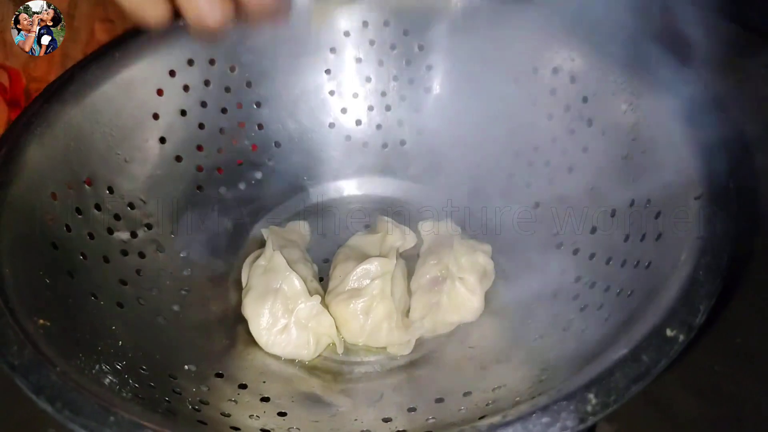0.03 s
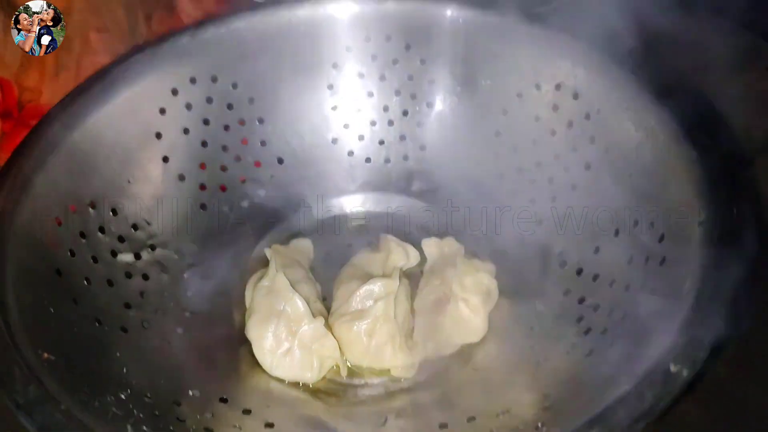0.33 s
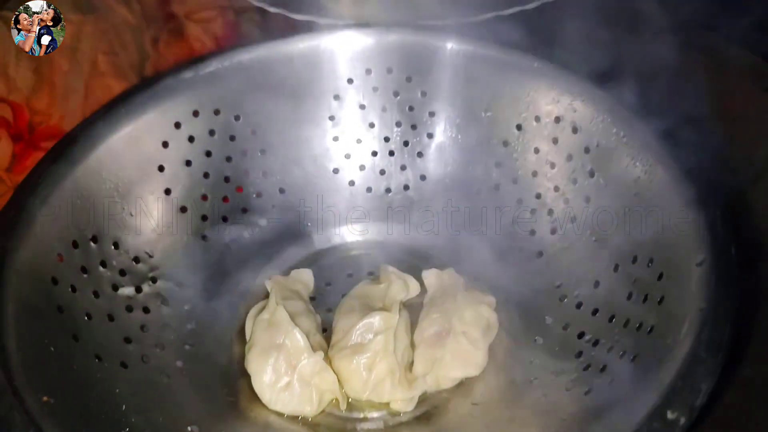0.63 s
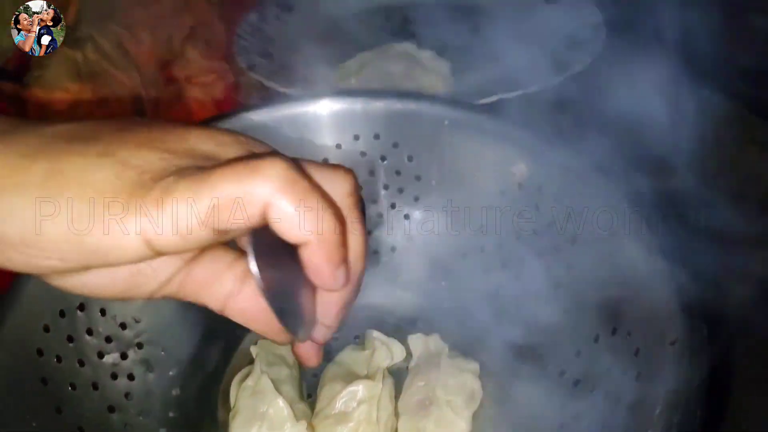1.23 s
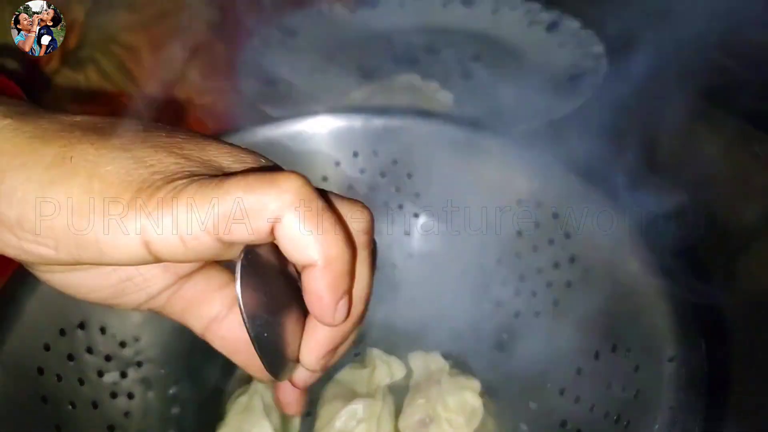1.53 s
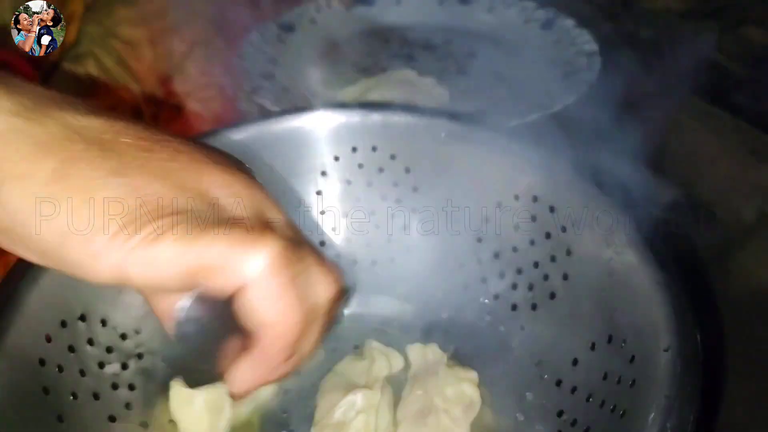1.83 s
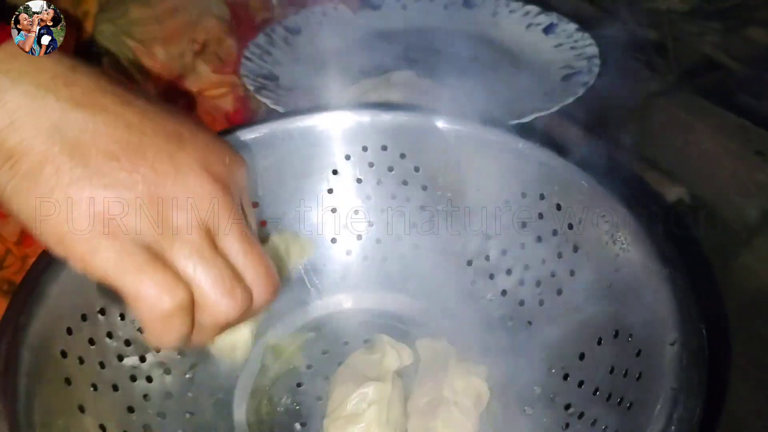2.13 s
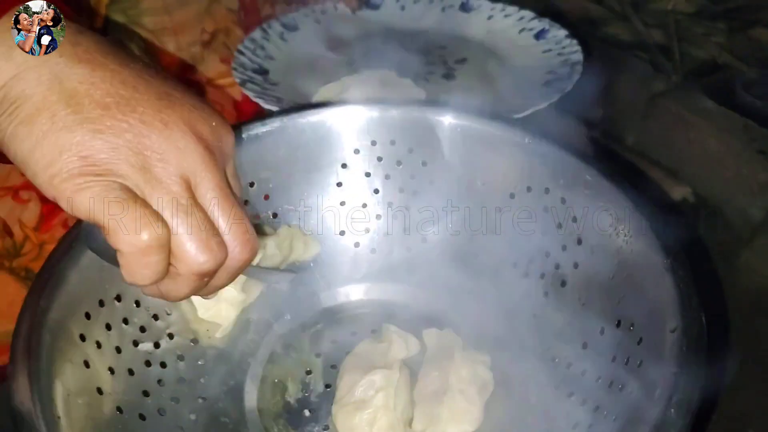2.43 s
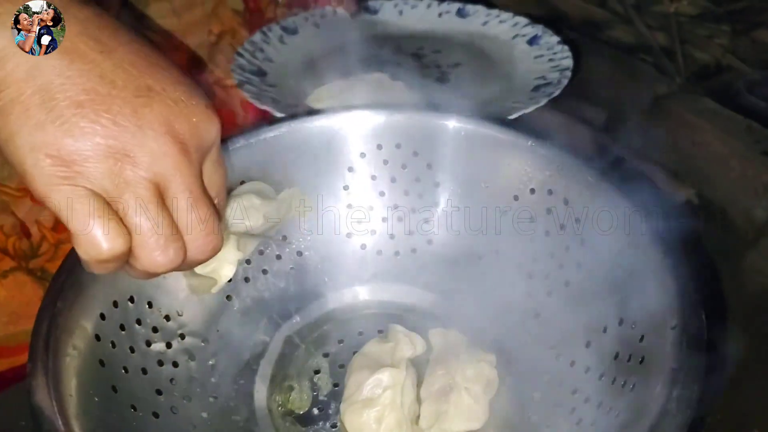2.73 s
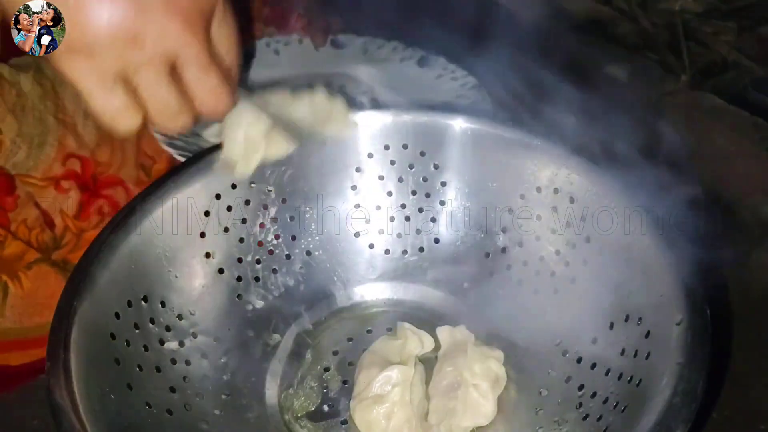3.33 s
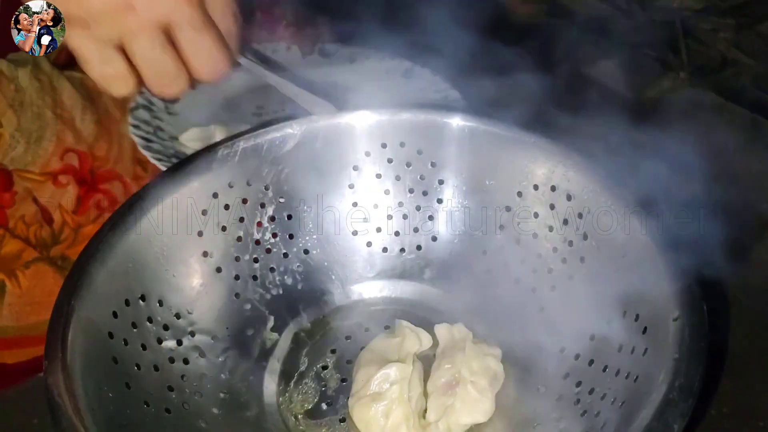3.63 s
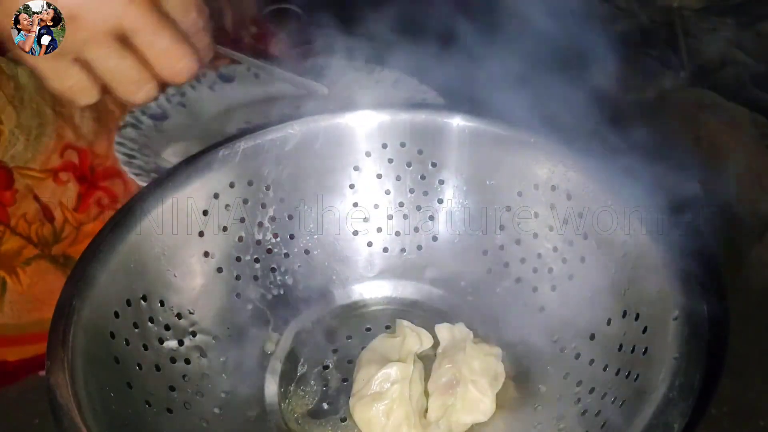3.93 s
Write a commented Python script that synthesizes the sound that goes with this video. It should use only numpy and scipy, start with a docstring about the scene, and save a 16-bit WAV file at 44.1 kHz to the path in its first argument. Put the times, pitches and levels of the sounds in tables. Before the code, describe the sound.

Steam hisses brightly from a steel steamer, close by, for the first 0.3 seconds. A lull follows, with faint insect chirps, a low rumble and a few soft water plops. From 2.3 seconds the steam surges and spits again, weakening after 3 and fading by 3.6. A spoon clinks on the metal at 3.7, scrapes across it with a slight squeal, and knocks a plate at 3.9.

```python
"""Steam hisses and spits from a perforated steel steamer in uneven surges: turbulent jets give broadband
noise, bursting drops give clicks, and the bowl colours both. Water plops in the pot below, which booms.
A spoon lifts out a dumpling with a faint hollow tone, clinks on the metal, scrapes across it and knocks
at the plate, each blow exciting damped modes. A cricket and a katydid stridulate faintly over a low
rumble. Two close microphone ports hear the steamer, the left one first."""
import sys
import numpy as np
from scipy import signal
from scipy.fft import rfft, irfft
from scipy.io import wavfile
from scipy.ndimage import uniform_filter1d

SR = 44100
rng = np.random.default_rng(int(sys.argv[2]) if len(sys.argv) > 2 else 0)


def digitize_waveform(pressure):
    """Quantize a signal to 16-bit integers and store it at the path in sys.argv[1].

    Rows of a 2-D input are taken as channels; values are limited to [-1, 1].
    """
    field = np.atleast_2d(pressure).T
    bounded = np.clip(field, -1, 1)
    quanta = np.round(bounded * 32767).astype(np.int16)
    wavfile.write(sys.argv[1], SR, quanta)


N = 176400

# Levels in the tables are relative.
# left minus right for sound from the steamer (frequency [Hz], level difference [dB])
PORT_BALANCE = [(300, 0), (1250, 1), (1800, 0.5), (2500, 0.5), (4400, 4.5), (8000, 4.5), (15000, 8.5)]
# resonances of the steel bowl (frequency [Hz], bandwidth [Hz], level [dB])
BOWL_RESONANCES = [(762, 81, 4), (1160, 60, 10), (1482, 24, 10)]
# steam surges, one list each (time [s], hiss level [dB], rush level [dB])
SURGES = [
    [(0.0, -32.5, -55), (0.026, -31.5, -57), (0.052, -37, -63.5), (0.148, -29, -54.5), (0.16, -32, -52.5),
     (0.198, -38, -66), (0.26, -41.5, -62), (0.284, -55, -80), (0.334, -81, -69), (0.36, -65, -85)],
    [(2.28, -82, -92), (2.298, -54.5, -58), (2.334, -38, -49.5), (2.376, -36, -53), (2.448, -32, -43.5),
     (2.526, -35, -46.5), (2.602, -32.5, -46), (2.62, -35, -42.5), (2.634, -42, -57.5), (2.66, -50, -55)],
    [(2.69, -45, -54.5), (2.702, -44, -57), (2.722, -43.5, -46.5), (2.74, -33, -47), (2.854, -37, -48.5),
     (2.904, -35.5, -49.5), (2.924, -40, -53), (2.974, -41.5, -57.5), (3.01, -53.5, -58.5)],
    [(3.04, -52.5, -58.5), (3.08, -46.5, -58.5), (3.196, -46.5, -58.5), (3.224, -46.5, -57),
     (3.286, -57, -66), (3.304, -54, -62), (3.312, -48, -57.5), (3.336, -40, -54.5), (3.372, -38.5, -52.5),
     (3.42, -47.5, -59.5), (3.602, -48.5, -65), (3.63, -59, -61)],
]
# spectra of the bright hiss and the lower rush (frequency [Hz], level [dB])
HISS_SPECTRUM = [(2500, -53), (4300, -42), (5000, -6), (5700, -0.5), (7500, 0), (9000, 0.5), (10500, -1.5),
                 (12500, -1.5), (14000, -2), (15300, 0.5)]
RUSH_SPECTRUM = [(120, -26.5), (350, -3.5), (700, -8), (1200, -9), (1750, -9.5), (2150, -4.5), (2450, 0),
                 (3200, 0), (3800, 0.5), (4600, -1), (6000, 0.5), (12000, -22)]
# drops spitting on hot metal (time [s], level [dB])
SPIT_EVENTS = [(.022, -27), (1.169, -44), (2.407, -28), (2.539, -19.5), (2.558, -19), (2.584, -17),
               (2.744, -23), (3.0227, -30.5), (3.092, -33)]
# hollow resonances colouring the first surge of steam (frequency [Hz], level [dB])
HOLLOW_RESONANCES = [(1950, -5), (2570, -7), (2850, 0.5), (3060, -0.5), (3330, -1.5), (3560, 5.5),
                     (3780, 6), (4400, 8.5)]
# their envelope (time [s], level [dB])
HOLLOW_ENVELOPE = [(0, -57.5), (.08, -57), (.13, -51), (.17, -54), (.2, -59), (.25, -56), (.33, -73),
                   (.45, -130)]
# spectra of the rumble, its side-signal filter and the airy hiss (frequency [Hz], level [dB])
RUMBLE_SPECTRUM = [(20, -25), (40, -13), (70, -0.5), (110, 4), (170, -5.5), (300, -10), (550, -12.5),
                   (900, -20.5), (1250, -18), (1800, -26), (3200, -23), (4400, -19.5), (6000, -27),
                   (10000, -27), (16000, -24.5)]
SIDE_FILTER = [(100, -14.5), (220, -13.5), (400, -4.5), (750, -4.5), (1300, 4), (2400, 0)]
AIR_SPECTRUM = [(200, -16), (1000, -19), (4000, -4), (15000, -4.5)]
# cricket chirps (time [s], duration [s], level [dB])
CRICKET_CHIRPS = [(0.21, .13, -57), (0.499, 0.12, -62.5), (0.75, 0.14, -66), (1.02, 0.13, -66),
                  (1.266, 0.13, -68.5), (1.544, 0.17, -72.5), (1.778, 0.16, -71), (2.113, 0.12, -69.5)]
# spectrum of the katydid's rasp (frequency [Hz], level [dB])
RASP_SPECTRUM = [(9000, -37), (12000, -12), (13500, 0), (14900, 8), (16000, -10)]
# plops in the pot (time [s], level [dB], centre frequency [Hz], splash T60 [s])
PLOP_EVENTS = [(.4945, -43.5, 786, 0.032), (.733, -51, 450, 0.037), (1.167, -37, 348, 0.02),
               (2.169, -42, 397, 0.025), (2.437, -45, 395, 0.099), (2.606, -31.5, 825, 0.057),
               (2.611, -39.5, 377, 0.031), (2.821, -44.5, 417, 0.059), (3.029, -43.5, 466, 0.025)]
# spectrum of a splash (frequency over centre frequency [ratio], level [dB])
SPLASH_SPECTRUM = [(.2, -20), (.5, -6), (1, 0), (3.07, -23.5), (20, -42)]
# spoon blows (time [s], crack [dB], crack T60 [s], tick [dB], steel [dB], plate [dB], spoon [dB])
SPOON_BLOWS = [(0.496, -43.5, 0.032, -58, -71, -58, -73), (3.6609, -21.5, 0.076, -18.5, -33, -33.5, -20),
               (3.671, -34, 0.1, -33, -45.5, -35, -41), (3.882, -16, 0.04, -33, -50, -28.5, -40)]
# spectrum of the contact crack (frequency [Hz], level [dB])
CRACK_SPECTRUM = [(30, -22), (150, -11.5), (350, -9.5), (550, -7), (850, -0.5), (1200, 6), (1700, 6.5),
                  (2150, 1), (2500, -4.5), (3000, -1.5), (4500, -7), (5700, 2), (8000, -6.5), (11000, -15),
                  (15500, -20)]
# normal modes of the steel dish, the plate and the spoon (frequency [Hz], level [dB], T60 [s])
STEEL_MODES = [(1150, 0, .15), (1277, 1, .17), (1480, 4, .25), (1765, 5, .3), (1895, -2, .3),
               (2035, -1, .5), (2165, -4, .4), (2270, -7, .4), (2500, -7, .5), (2700, -5, .6),
               (2821, -6, .6), (2950, -5, .5), (3074, -2, .35), (3205, -5, .45), (3343, -4, .8),
               (3492, -4, .8), (3797, -1, .6), (3965, -3, .7), (4124, -1, .6), (4479, -7, .6),
               (4800, -7, .4), (5044, -5, .4), (5292, -5, .5), (6132, 0, .12)]
PLATE_MODES = [(1118, -3, .2), (1211, -3, .17), (1540, -2, .35), (1720, -1, .17), (2040, -3, .35),
               (2137, -3, .35), (2541, -7, .14), (3020, 3, .08), (3090, -2, .15), (3575, -4, .1),
               (4867, -5, .22), (5367, -3, .15), (5582, 3, .14), (5782, -2, .17), (6266, -2, .12)]
SPOON_MODES = [(6900, -8, .07), (8400, 4, .06), (9030, 4.5, 0.045), (9000, -9, .05), (10300, 1, .05),
               (13800, 0, 0.046), (14700, -3, .04)]
# envelope of the steamer's boom (time [s], level [dB])
BOOM_ENVELOPE = [(2.35, -86), (2.45, -51), (3.0, -82), (3.62, -73), (3.66, -44.5), (3.78, -56.5),
                 (3.88, -49), (4, -56)]
# spectrum of that boom (frequency [Hz], level [dB])
BODY_SPECTRUM = [(30, -31), (80, -0.5), (340, -7), (1000, -32.5)]
# hollow tone of the lifted dumpling (time [s], level [dB], centre frequency [Hz])
DUMPLING_TONE = [(2.95, -100, 470), (3.09, -65, 470), (3.12, -50, 490), (3.18, -56.5, 535),
                 (3.28, -54.5, 530), (3.35, -60, 570), (3.42, -60, 570), (3.52, -55, 600),
                 (3.61, -51.5, 560), (3.72, -49, 560)]
# drag of the spoon (time [s], scrape level [dB], squeal level [dB], squeal frequency [Hz])
SPOON_DRAG = [(3.61, -120, -120, 1400), (3.635, -64, -38, 1392), (3.657, -30, -47, 1520),
              (3.68, -38, -38, 1550), (3.725, -42, -43, 1800), (3.76, -34, -41, 3430),
              (3.80, -28.5, -36, 2892), (3.825, -27.5, -37, 2106), (3.845, -27, -27.5, 1717),
              (3.858, -30, -27, 1694), (3.87, -24.5, -33.5, 1752), (3.895, -27, -36, 1606),
              (3.915, -46, -39, 1710), (3.95, -57, -46, 1900), (4, -91, -55, 1900)]
# spectrum of the scrape (frequency [Hz], level [dB])
SCRAPE_SPECTRUM = [(30, -33), (200, -26), (550, -6), (800, -14.5), (1200, -6.5), (1700, -7), (2250, -11),
                   (3000, -2), (4700, -3), (5600, 6), (7500, 7), (10000, 2), (12500, -2.5), (15500, -1.5)]

TIME, BIN_HZ = np.arange(N) / SR, np.arange(N // 2 + 1) * SR / N
PORT_LAG_S, ROOM_T60_S, ROOM_DB, SCATTER_DB = .000293, .094, 1, 1.5


def undb(db):
    """Amplitude ratio of a level in decibels."""
    return 10 ** (np.asarray(db) / 20)


def unit(x):
    """Normalisation to rms 1."""
    return x / np.sqrt(np.mean(x ** 2))


def noise():
    """Gaussian white noise."""
    return rng.standard_normal(N)


def walk(rate):
    """Smooth random signal of rms 1, with `rate` new values a second."""
    hold = int(SR / rate)
    steps = np.repeat(rng.standard_normal(N // hold + 1), hold)
    return unit(uniform_filter1d(steps, hold)[:N])


def flutter(db, rate):
    """Log-normal amplitude modulation of rms 1."""
    return unit(undb(db * walk(rate)))


def envelope(rows, column=1):
    """Amplitude over time, interpolated in decibels."""
    rows = np.array(rows)
    return undb(np.interp(TIME, rows[:, 0], rows[:, column]))


def glide(rows):
    """Frequency over time, interpolated along the last column."""
    rows = np.array(rows)
    return np.interp(TIME, rows[:, 0], rows[:, -1])


def decay(start, t60):
    """Sudden onset and exponential decay, 60 dB in t60 seconds."""
    age = TIME - start
    return (age >= 0) * np.exp(-np.log(1000) * np.maximum(age, 0) / t60)


def response(points):
    """Magnitude response, interpolated on a logarithmic frequency axis."""
    hz, db = np.array(points, float).T
    return undb(np.interp(np.log(BIN_HZ + 1), np.log(hz), db))


def colour(x, points):
    """Minimum-phase filter that preserves the power of white noise."""
    cepstrum = irfft(np.log(unit(response(points))), N)
    cepstrum[1:N // 2] *= 2
    cepstrum[N // 2 + 1:] = 0
    impulse = irfft(np.exp(rfft(cepstrum)), N)[:N // 32]
    return signal.fftconvolve(x, impulse)[:N]


def clicks(per_s, spread_db):
    """Shot noise: a Poisson train of impulses with random sign and size."""
    hits = rng.random(N) < per_s / SR
    sizes = undb(spread_db * np.minimum(rng.exponential(size=N), 5))
    return unit(hits * np.sign(noise()) * sizes)


def narrowband(hz, width_hz):
    """Noise-driven resonance: two random quadrature components about a moving centre."""
    phase = 2 * np.pi * np.cumsum(hz) / SR
    return (walk(width_hz * 2) * np.cos(phase) + walk(width_hz * 2) * np.sin(phase)) / np.sqrt(2)


def pan(db):
    """Gains that set the left channel `db` above the right."""
    return undb(np.array([[db], [-db]]) / 2)


def port_gains():
    """Frequency-dependent level difference at constant total power; the left port is brighter."""
    tilt = response(PORT_BALANCE)
    return np.array([tilt, np.ones_like(tilt)]) / np.sqrt((1 + tilt ** 2) / 2)


def ports(x):
    """Path difference: direct sound reaches the left port first, and short reflections follow."""
    lag = np.exp(-2j * np.pi * BIN_HZ * PORT_LAG_S)
    channels = []
    for delay, gain in zip((1, lag), port_gains()):
        tail = noise() * decay(.001, ROOM_T60_S)
        room = signal.fftconvolve(x, tail / np.sqrt(np.sum(tail ** 2)))[:N] * undb(ROOM_DB)
        reflections = rfft(room) * BIN_HZ / (BIN_HZ + 500)  # weak in the bass
        channels.append(irfft((rfft(x) * delay + reflections) * gain, N))
    return np.array(channels) / np.sqrt(1 + undb(2 * ROOM_DB))


def in_bowl(source):
    """Resonances filter a random source, heard directly and as scatter uncorrelated between the ports."""
    peaks = sum(undb(2 * db) / (1 + (2 * (BIN_HZ - hz) / width) ** 2)
                for hz, width, db in BOWL_RESONANCES)
    bowl = undb(-.5) * np.sqrt(1 + peaks)
    scattered = np.array([irfft(rfft(source()) * bowl * gain, N) for gain in port_gains()])
    direct = ports(irfft(rfft(source()) * bowl, N))
    return (direct + undb(SCATTER_DB) * scattered) / np.sqrt(1 + undb(2 * SCATTER_DB))


def splutter(x):
    """Bursting drops modulate each fifth-octave band from 1 to 16 kHz independently."""
    spectrum = rfft(x)
    position = 5 * np.log2(np.clip(BIN_HZ / 1000, 1, 16))
    bands = (irfft(spectrum * np.maximum(1 - abs(position - k), 0), N) for k in range(21))
    return sum(band * flutter(db=2.4, rate=35) for band in bands)


def steam():
    """Turbulent jets radiate a hiss over a lower rush; tiny drops sizzle and large drops spit."""
    flow = [row for surge in SURGES for row in surge]
    first_surge, later_surges = TIME < SURGES[0][-1][0], TIME > SURGES[1][0][0]
    flowing = (first_surge | later_surges) * undb(1.11 * walk(rate=60))

    def sizzle():
        return (noise() + undb(-4.5) * clicks(per_s=970, spread_db=3.5)) * flowing

    def jet():
        hiss = colour(sizzle() * envelope(flow), HISS_SPECTRUM)
        rush = colour(sizzle() * envelope(flow, 2), RUSH_SPECTRUM)
        return (hiss + rush) * undb(4.5)

    bursts = sum(undb(db) * decay(start, t60=.008) for start, db in SPIT_EVENTS)
    spits = colour(noise() * bursts, HISS_SPECTRUM)
    return (splutter(in_bowl(jet)) + ports(spits) * pan(6)) * np.where(first_surge, pan(.5), 1)


def hollow_resonances():
    """Narrowband noise: a row of drifting hollow resonances colours the first surge of steam."""
    drift = 1 + .006 * walk(rate=14.1)
    tones = sum(undb(db) * narrowband(hz * drift, width_hz=70) for hz, db in HOLLOW_RESONANCES)
    return ports(unit(tones) * envelope(HOLLOW_ENVELOPE))


def background():
    """Ambient noise: a rumble whose bass is coherent between the ports, and an airy hiss that decays."""
    mid, side = (colour(noise(), RUMBLE_SPECTRUM) for _ in range(2))
    side = irfft(rfft(side) * response(SIDE_FILTER), N)
    rumble = np.array([mid + side, mid - side]) * undb(-61 + 1.36 * walk(rate=12))
    air = np.array([colour(noise(), AIR_SPECTRUM) for _ in range(2)])
    return rumble + air * undb(-52.5) * decay(0, t60=4.1)


def cricket(carrier_hz=5030, pulse_hz=45.2):
    """Tonal stridulation on the right: an amplitude-modulated carrier swells into chirps."""
    chirps = sum(undb(db) * np.sqrt(np.sin(np.pi * np.clip((TIME - start) / length, 0, 1)) + 1e-12)
                 for start, length, db in CRICKET_CHIRPS)
    carrier = np.sin(2 * np.pi * np.cumsum(carrier_hz + 55 * walk(rate=250)) / SR)
    pulses = 1 + .29 * np.sin(2 * np.pi * pulse_hz * TIME)
    return carrier * (chirps + undb(-83.5)) * pulses * flutter(db=3.5, rate=70) * pan(-11.5)


def katydid(period_s=.54, pair_s=.12, sigma_s=.03):
    """Noisy stridulation: high rasps in pairs, with Gaussian envelopes that slowly weaken."""
    centres = .249 + period_s * np.arange(9)
    rasps = sum(np.exp(-.5 * ((TIME - centre - offset) / sigma_s) ** 2)
                for centre in centres for offset in (0, pair_s))
    treble = np.array([colour(noise(), RASP_SPECTRUM) for _ in range(2)])
    return treble * rasps * undb(-51 - .5 * TIME)


def plops():
    """Each plop of water is a damped oscillation with a splash of noise about the same frequency."""
    water = 0
    for start, db, hz, t60 in PLOP_EVENTS:
        thud = undb(1) * decay(start, t60=.014) * np.sin(2 * np.pi * hz * (TIME - start))
        spectrum = [(hz * ratio, level) for ratio, level in SPLASH_SPECTRUM]
        splash = colour(noise() * decay(start, t60), spectrum)
        water += undb(db) * (thud + splash)
    return ports(water)


def ring(modes, start):
    """Free vibration after a blow: each damped mode beats against a weaker, detuned twin."""
    age = TIME[:N // 8]
    ringing = 0
    for hz, db, t60 in modes:
        tone = np.sin(2 * np.pi * (hz * age + rng.random()))
        twin_hz = hz + rng.normal(11.9, 7)
        twin = np.sin(2 * np.pi * (twin_hz * age + rng.random()))
        ringing += undb(db) * np.exp(-np.log(1000) * age / t60) * (tone + twin / 3)
    return np.pad(ringing / 2, (int(start * SR), N))[:N]


def spoon_blows(damped_s=3.8):
    """Impact excitation: each blow gives a crack and a treble tick and rings steel, plate and spoon."""
    damping = np.where(TIME < damped_s, 1, decay(damped_s, t60=.1))  # the dragging spoon stills the steel
    cracks = ticks = rings = 0
    for start, crack_db, t60, tick_db, steel_db, plate_db, spoon_db in SPOON_BLOWS:
        cracks += undb(crack_db) * decay(start, t60)
        ticks += undb(tick_db) * decay(start, t60=.018)
        rings += undb(spoon_db) * ring(SPOON_MODES, start)
        rings += undb(steel_db) * ring(STEEL_MODES, start) * damping
        rings += undb(plate_db) * ring(PLATE_MODES, start)
    crack = colour(noise() * cracks, CRACK_SPECTRUM)
    tick = colour(noise() * ticks, HISS_SPECTRUM)
    return ports(rings + crack) + ports(tick) * pan(13.5) / 2


def boom():
    """Forced vibration: the heavy steamer booms under the strongest surge and the leaning spoon."""
    return ports(colour(noise(), BODY_SPECTRUM) * envelope(BOOM_ENVELOPE))


def dumpling():
    """A gliding resonance gives a faint, broken hollow tone as the dumpling climbs the wall."""
    tone = narrowband(glide(DUMPLING_TONE), width_hz=74)
    return ports(tone * envelope(DUMPLING_TONE) * flutter(db=3.5, rate=35))


def spoon_scrape():
    """Stick-slip friction: dense slips chatter together with a squeal that rises and falls."""
    chatter = flutter(db=2, rate=220)
    squeal = narrowband(glide(SPOON_DRAG), width_hz=520) * envelope(SPOON_DRAG, 2) * chatter
    drag = envelope(SPOON_DRAG) * chatter
    scrape = in_bowl(lambda: colour(clicks(per_s=9000, spread_db=-.5) * drag, SCRAPE_SPECTRUM))
    return scrape + ports(squeal)


def scene():
    """Linear superposition of all sources."""
    return (steam() + hollow_resonances() + background() + cricket() + katydid() + plops()
            + spoon_blows() + boom() + dumpling() + spoon_scrape())


def record(dry):
    """Band limiting: an elliptic low-pass filter cuts the treble above 15.5 kHz."""
    return signal.sosfilt(signal.ellip(12, .2, 80, 15500, fs=SR, output="sos"), dry)


dry = scene()
out = record(dry)
digitize_waveform(out)
```